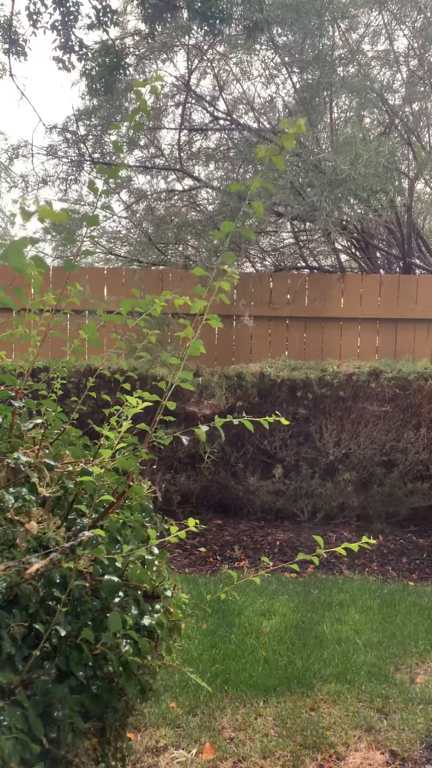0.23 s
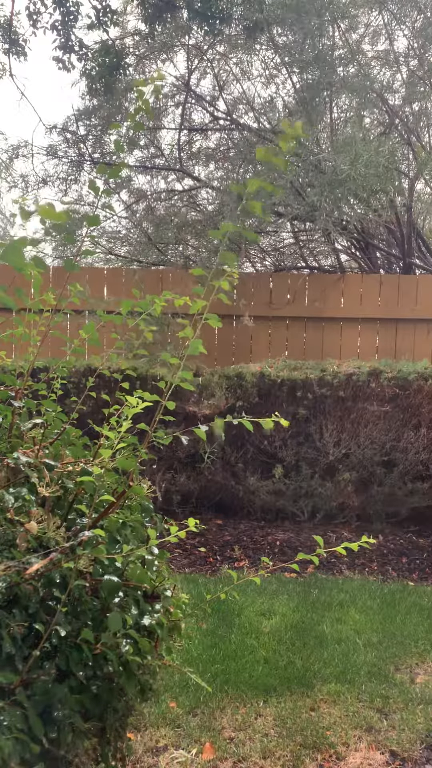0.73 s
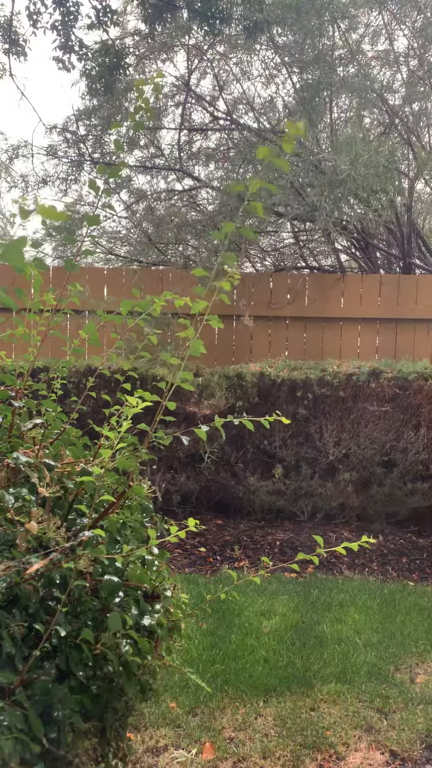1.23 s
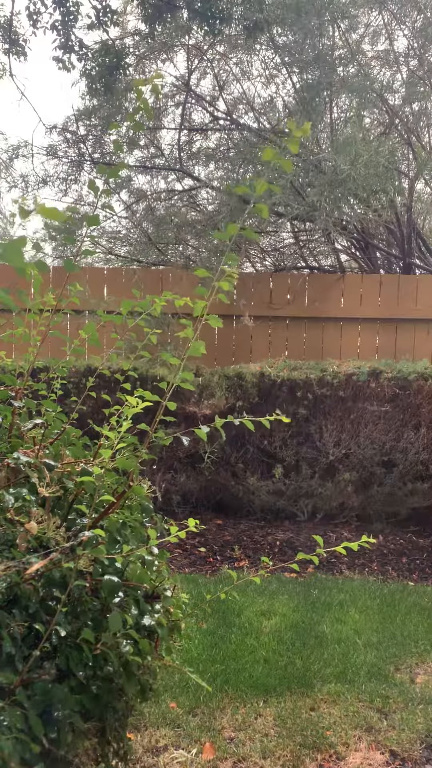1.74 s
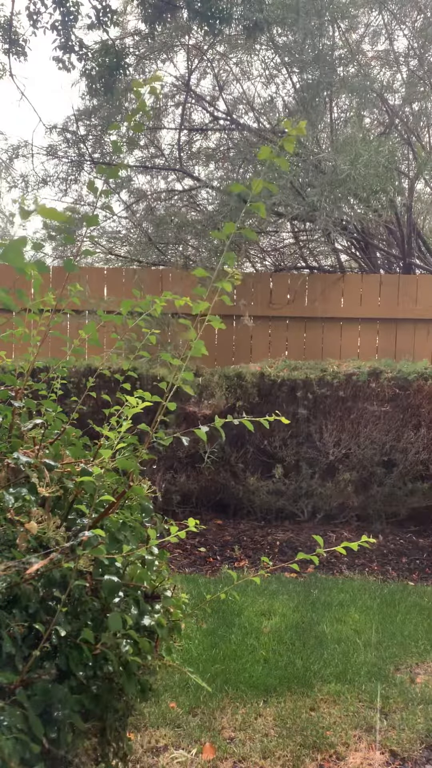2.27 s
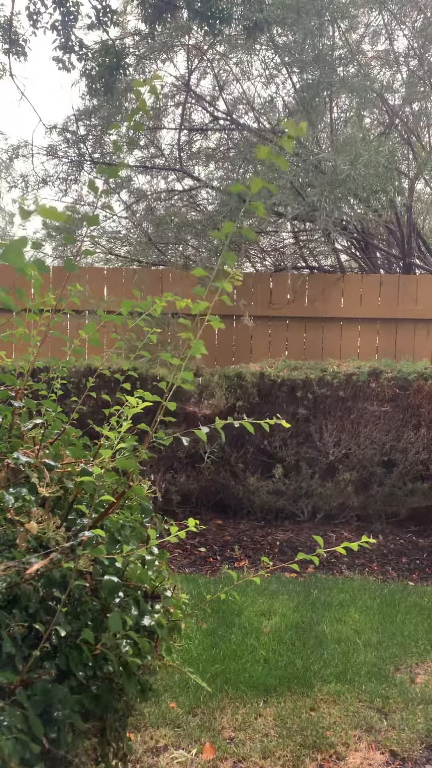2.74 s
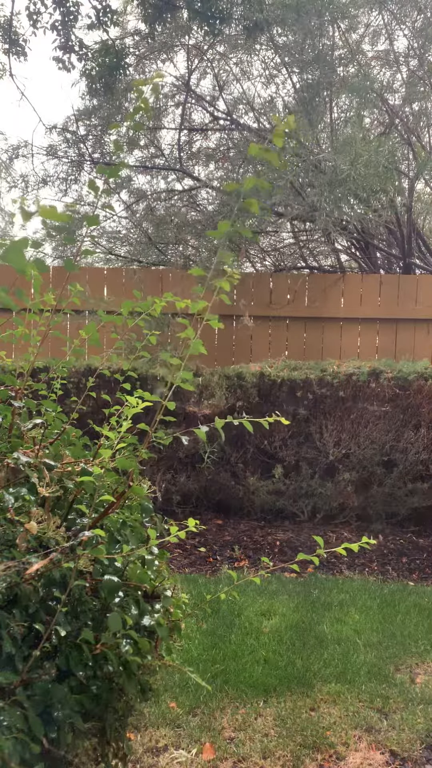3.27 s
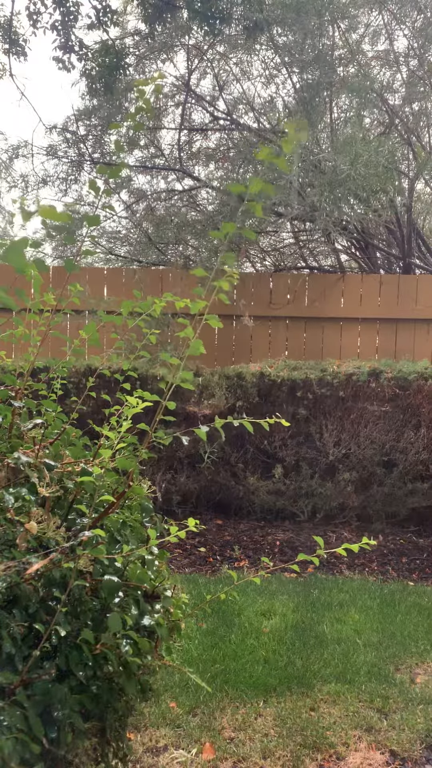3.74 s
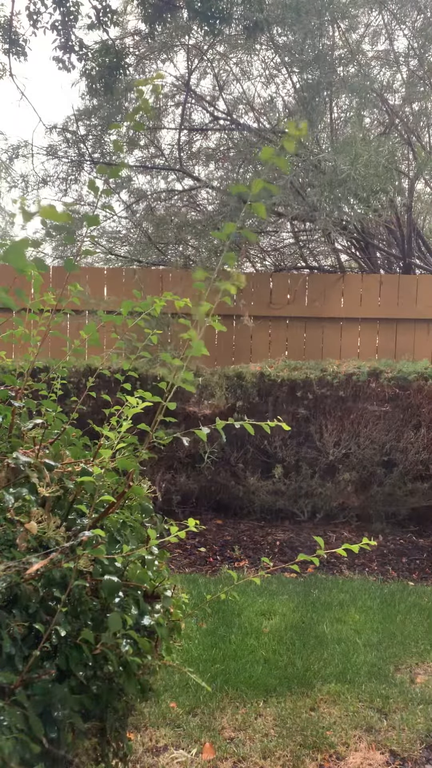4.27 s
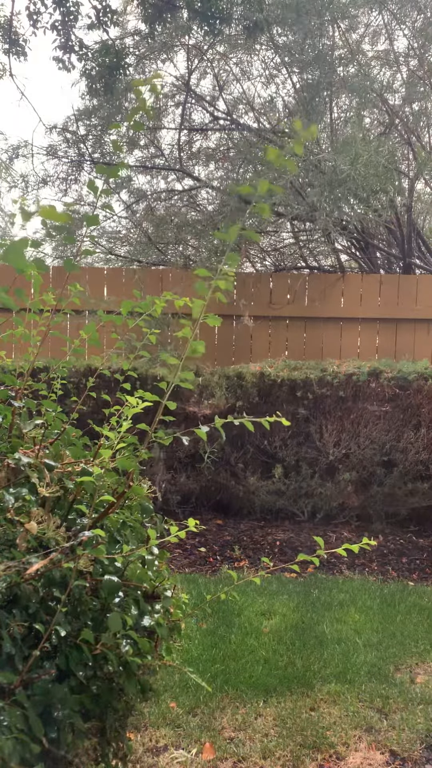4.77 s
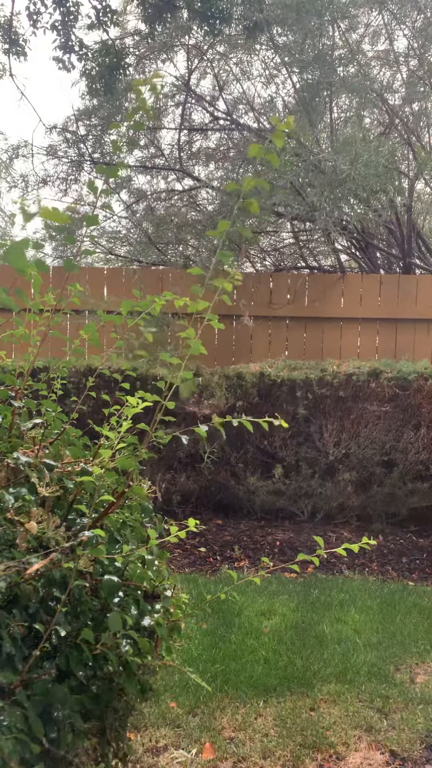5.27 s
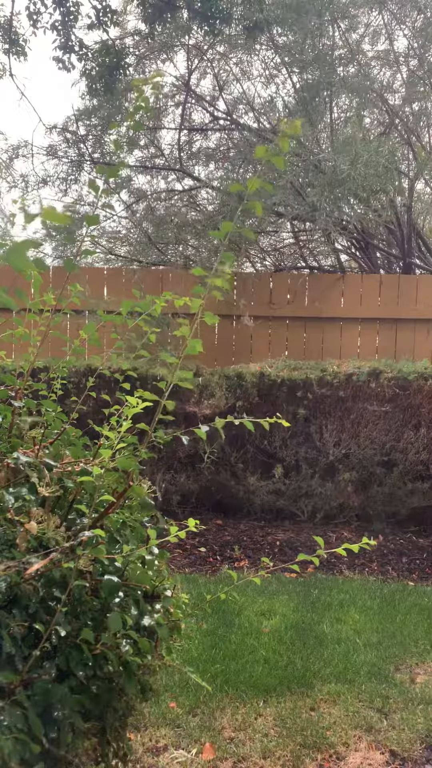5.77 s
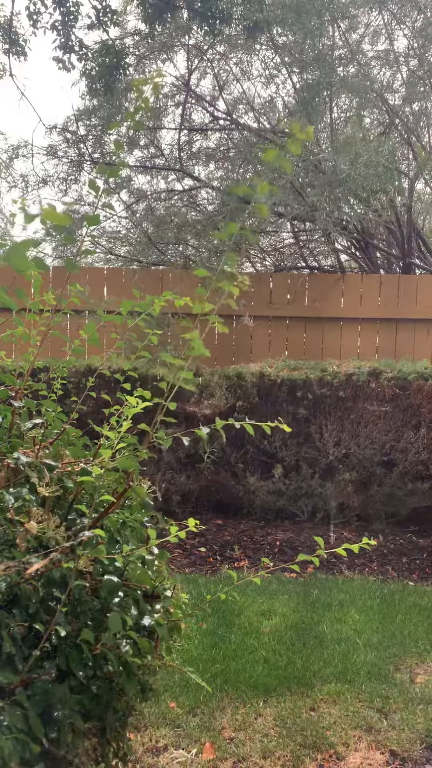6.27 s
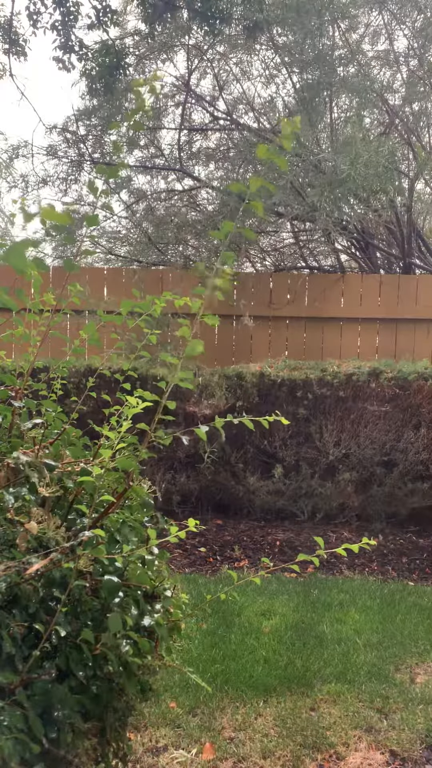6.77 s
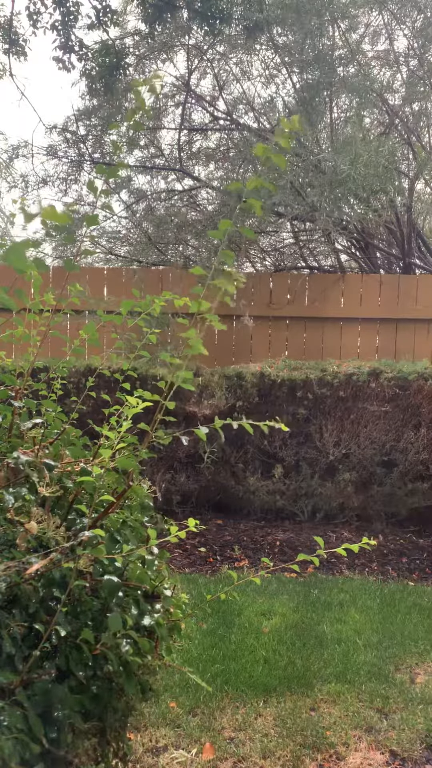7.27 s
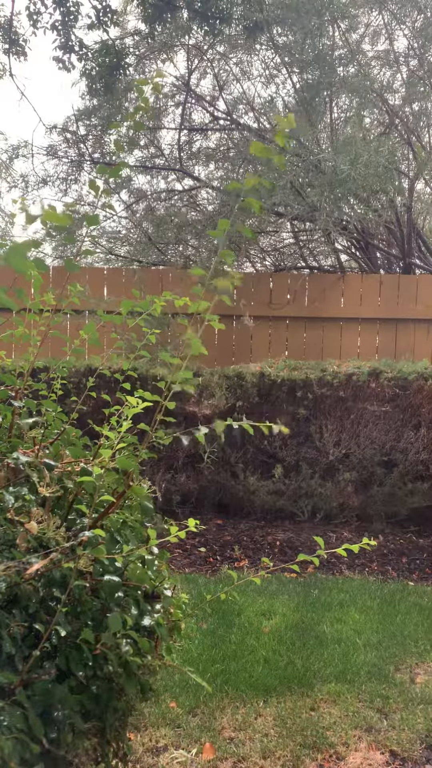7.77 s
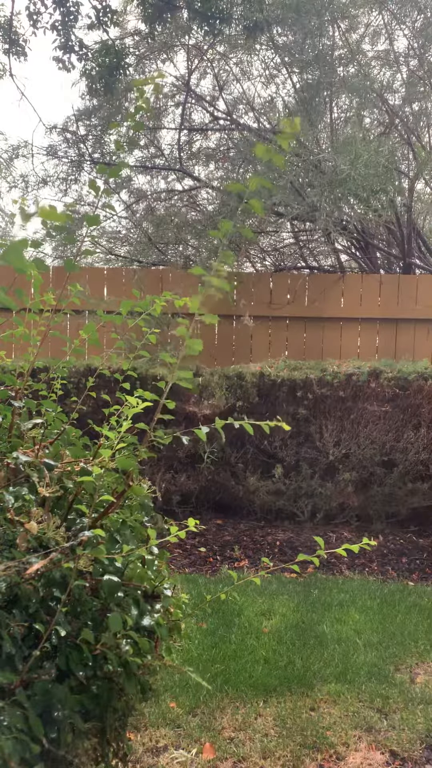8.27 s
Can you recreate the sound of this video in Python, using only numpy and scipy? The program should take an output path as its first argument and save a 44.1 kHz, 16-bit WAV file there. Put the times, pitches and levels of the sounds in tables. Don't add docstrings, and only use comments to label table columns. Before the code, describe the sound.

From 0 to about 8.5 seconds, steady rain falls in a backyard with shrubs, lawn and fence. It is already under way and continues to the end, its strength wavering only slightly. Distant drops blend into a bright, wide hiss; nearer ones make a dense, fine patter and crackle. Irregular close drops stand out throughout: crisp leaf ticks, tiny dry twig clicks, rounded plops sinking in pitch, and a few dull thuds on soil. Sharper thin splashes come near 2.1 and 6.65 seconds, and the strongest leaf snap near 4.95. Far off, a weak low engine drone sinks in pitch until about 3.9, most noticeable around 2 to 3.4, then stays low and faint over soft traffic rumble. The stereo microphone is still, close to the foliage, with very short reflections from fence and walls.

```python
import sys
import numpy as np
from scipy import signal
from scipy.fft import rfft, irfft
from scipy.io import wavfile
from scipy.ndimage import uniform_filter1d

SR = 44100
rng = np.random.default_rng(int(sys.argv[2]) if len(sys.argv) > 2 else 0)


def decibels_to_gain(level_db):
    exponent = np.asarray(level_db, float) / 20
    return 10 ** exponent


def inscribe(sig):
    pcm = np.round(np.clip(np.atleast_2d(sig).T, -1, 1) * 32767)
    wavfile.write(sys.argv[1], SR, pcm.astype(np.int16))


N = 375291

# t/s, level/dB
RAIN = [(0.0, -45), (0.33, -44.5), (0.45, -44.5), (0.871, -45), (1.02, -45), (1.59, -44.5), (1.92, -44),
        (2.89, -44.5), (3.27, -44.5), (4.81, -45.5), (5.02, -43.5), (5.95, -45), (7.85, -44.5), (8.08, -46),
        (8.51, -43.5)]
FIZZ_SHARE, PATTER_SHARE = 0.88, 0.61
# f/Hz, level per Hz/dB
WASH = [(150, -6), (350, -7), (600, -1.5), (1000, 5), (1500, 0.5), (2200, 4.5), (3200, 5), (5000, 7),
        (7000, 4), (9500, 7), (11200, 6), (12300, 0.5), (15500, 6), (17000, -80)]
# f/Hz, level/dB
PATTER = [(400, 0), (800, -6.5), (1500, -4), (3000, -4.5), (5000, 0.5), (7000, 4.5), (11200, 5),
          (15500, 2.5)]
# f/Hz, phase/rad
RIGHT_LAG = [(0, 0), (1000, .15), (2000, .9), (2900, 2.0), (3700, 1.7), (4800, 3.14), (17400, 21.99)]
# f/Hz, level/dB
APART = [(60, -47), (180, -17.5), (350, -5.5), (600, -2), (1000, -1.5), (1600, -3), (2500, -0.45),
         (3300, -1.9), (4200, -3.5), (5000, -9.5), (16000, -6)]
# f/Hz, width/Hz, level/dB
EAVES = [(816, 300, 4), (934, 11, -5.5), (1163, 26, 4.5), (1294, 50, 8), (1470, 148, 6.5), (1570, 36, 7.5),
         (1735, 144, 6.5), (1950, 120, 5), (2166, 270, 1.5), (2514, 49, 6), (2886, 17, 4), (3190, 19, -7.5)]
# t/s, firing f/Hz, level/dB
ENGINE = [(0, 124.5, -58.5), (.35, 124, -55.5), (.8, 123, -50.5), (1.4, 122, -57), (1.7, 118, -50.5),
          (2, 113, -46.5), (2.6, 110, -55.5), (3.1, 108, -47), (3.4, 107, -44), (3.65, 103, -51),
          (3.85, 97, -56.5), (4.6, 98, -51), (5.2, 98, -53), (6, 97, -59.5), (6.3, 96, -60.5),
          (7.7, 98.5, -54), (8.51, 100, -54)]
# f/Hz, level per Hz/dB
RUMBLE = [(8.8, -58), (15, -10), (32, -7.5), (80, -1), (94, -4), (112, -6), (140, -6.5), (241, -9.5),
          (270, -10.5), (311, -13.5), (348, -19), (379, -15.5), (450, -18.5), (580, -28), (990, -120)]
# t/s, level/dB
RUMBLE_DB = [(0, -53.5), (3.5, -53.5), (8.51, -53)]

# f/Hz, rise/cycles
LEAF = [(4000, 1.0), (7100, 1.5), (11000, 1.7), (14500, 2.2)]
BROAD_LEAF = [-3, 3.5, 16, 14]
SMALL_LEAF = [-17, 9, 7, 17]
TINY_LEAF = [-22, 1.5, 8, 6]
# t/s, peak level/dB, spill into other rings/dB
BROAD_TICKS = [(0.0124, -38, -19), (0.1935, -40.5, -5), (0.2299, -25.5, -32), (0.5916, -26, -14.5),
               (0.6459, -28, -25.5), (0.9273, -25, -10.5), (0.9657, -25, -18), (1.1867, -28, -16),
               (1.2004, -32, -4), (1.4581, -25, -16), (1.6222, -24.5, -15), (1.8342, -25.5, -10),
               (1.9061, -20, -11), (1.9584, -26, -18), (2.1181, -25.5, -11), (2.5341, -29.5, -15.5),
               (3.247, -23.5, -17), (3.3418, -33.5, -8), (3.5279, -26.5, -19), (3.7713, -25, -19),
               (4.4263, -31.5, -10), (5.1402, -28, -11.5), (6.6483, -25, -12), (6.7092, -31, -5),
               (7.1906, -27.5, -9), (7.5153, -26, -19), (7.5882, -23.5, -26), (7.891, -28.5, -13),
               (7.9453, -32, -15), (8.1055, -28.5, -11)]
SMALL_TICKS = [(0.0682, -37, -12), (0.5275, -33, -1), (1.6634, -26, -7), (2.1885, -27, -15), (2.2, -27, -8),
               (2.353, -28, -10), (2.364, -29, -8), (2.735, -30, -5.5), (3.039, -30, -13),
               (3.3794, -31, -8), (3.708, -33, -9), (3.7567, -40, -10), (4.253, -29.5, -7),
               (4.573, -25, -10), (4.6648, -32, -10.5), (4.871, -23, -21), (4.902, -26, -9),
               (4.94, -28, -21), (4.9519, -12.5, -18), (5.29, -44, -21), (5.584, -28.5, -9),
               (5.7492, -26, -10), (5.8065, -39, -21), (6.0806, -35, -8), (6.622, -24, -16),
               (6.728, -30.5, -7), (6.9907, -38, -13), (7.004, -33, -19.5), (7.8456, -27.5, -14),
               (8.407, -41, -21)]
TINY_TICKS = [(0.1865, -37, -11), (0.3102, -36.5, -3), (0.504, -20, -17), (0.569, -30, -0.5),
              (1.0914, -27, -11), (1.2531, -23, -23), (2.123, -24, -16), (2.3855, -32, -16),
              (2.4747, -26, -7), (2.5097, -25, -4), (2.814, -25.5, -8.5), (3.1737, -34, -8),
              (3.7948, -26, -10), (4.8274, -33, -18), (6.098, -22, -18), (6.9411, -23, -12),
              (7.43, -24.5, -8.5), (7.7383, -25, -7), (7.9806, -41, -13), (8.2152, -42, -4)]
MORE_BROAD = [(1.1516, -30, -26.5), (1.629, -25, -17), (1.8855, -29, -17), (2.0556, -30, -23),
              (2.449, -33, -27), (3.0774, -28.5, -14), (3.1947, -30, -16), (3.3892, -29, -22),
              (4.2176, -28.5, -13), (6.5903, -32, -9), (7.1114, -30, -8), (7.3305, -31, -15.5)]
MORE_SMALL = [(1.062, -30, -13), (1.202, -38, -16), (1.2471, -30, -17), (1.8184, -34, -19),
              (1.8455, -30, -15), (2.1612, -28, -8), (2.3706, -30.5, -23), (2.488, -31, -22),
              (2.5346, -28.5, -18.5), (3.1434, -26.5, -8), (3.395, -29, -14), (3.4272, -30, -16),
              (3.6235, -33, -11), (3.837, -28, -14), (3.848, -28, -14), (4.3781, -39, -19),
              (4.9652, -22, -14), (4.9847, -26, -8.5), (5.3963, -35, -26), (5.8065, -28, -15),
              (6.2138, -30, -12), (6.4788, -32, -20), (7.0037, -30, -14), (7.2256, -30, -6),
              (7.4812, -30, -12), (7.7974, -39, -17), (7.9056, -38, -17), (8.2145, -38, -17),
              (8.2484, -29.5, -18), (8.3107, -31, -18), (8.4068, -36, -27), (8.4479, -34, -9)]
MORE_TINY = [(0.9705, -36, -1), (1.933, -35, 3), (2.385, -30, -9), (2.6066, -43, -17), (2.6168, -32, -4),
             (3.249, -24, -2.5), (3.3417, -30, -1), (3.644, -37, 2), (3.757, -24, -10), (4.156, -35, 1),
             (4.441, -37, -12), (4.8279, -34, -9), (5.1064, -34, -1), (5.291, -44, -3), (6.9907, -20, -9),
             (7.3143, -37, 1), (7.4156, -26, -10), (7.9786, -34, -5), (8.0447, -33, -14), (8.287, -38, -9)]
# t/s, peak level/dB
CRACKS = [(.0692, -26), (.0745, -32), (.31, -23), (.3603, -30), (.5276, -22), (.9702, -30), (.9906, -31),
          (1.1326, -31), (1.2014, -27), (1.4425, -29), (1.5414, -31), (1.623, -17), (1.845, -27),
          (2.371, -24), (2.386, -29), (2.488, -28), (2.5396, -30), (2.5467, -31), (2.6066, -31),
          (2.812, -25), (3.104, -26), (3.17, -25), (3.3954, -31), (3.541, -25), (3.7163, -31),
          (3.7277, -30), (3.7573, -27), (3.8485, -30), (3.9179, -30), (4.1552, -29), (4.378, -31),
          (4.4396, -25), (4.4725, -26), (4.665, -24), (4.828, -23), (5.1406, -28), (5.289, -25),
          (5.5236, -32), (6.0807, -31), (6.2262, -31), (6.5836, -31), (6.73, -26), (6.892, -31),
          (7.112, -27), (7.0042, -25), (7.3132, -26), (7.3304, -31), (7.7339, -31), (7.797, -31),
          (7.9056, -31), (7.9785, -31), (8.045, -31), (8.216, -26), (8.2881, -31), (8.407, -21)]
# t/s, peak level/dB, lean to left/dB
HARD_CRACKS = [
    (2.352, -23, 0),
    (3.0397, -22, -2),
    (3.708, -21, -1),
    (6.6477, -23, -8),
    (6.941, -24, 3),
]

# t/s, peak level/dB, f/Hz
PLOPS = [(0.0917, -26.5, 1610), (0.193, -34.5, 2000), (0.4, -34.5, 1720), (0.4287, -27.5, 660),
         (1.254, -32, 1750), (1.813, -30.5, 1940), (1.942, -32.5, 1590), (2.006, -34.5, 1470),
         (2.118, -38, 1230), (2.29, -34.5, 1080), (2.963, -35.5, 1250), (3.155, -31.5, 1570),
         (3.344, -37, 2000), (3.42, -35, 1410), (3.435, -28, 1310), (4.182, -36, 1950), (4.588, -33.5, 457),
         (4.884, -34, 1550), (5.1856, -25.5, 1200), (5.343, -34, 1140), (5.523, -37, 1470),
         (5.734, -36, 1590), (5.748, -30, 1770), (5.94, -31.5, 1050), (6.447, -35, 1380),
         (6.942, -39, 2000), (7.185, -33.5, 1190), (7.235, -30, 1410), (8.289, -35, 1460),
         (8.473, -33, 1470),
         (0.0597, -35, 1760), (0.067, -34.5, 2100), (0.2772, -33, 2200), (0.4421, -43, 870),
               (0.505, -37, 1860), (0.5128, -39, 1750), (0.5562, -35.5, 1250), (0.5787, -35.5, 1400),
               (0.7487, -38.5, 1770), (0.835, -33, 1870), (0.8974, -40, 2520), (0.9998, -34.5, 1960),
               (1.335, -34, 2160), (1.5033, -35, 1170), (1.5684, -36, 1510), (1.7572, -35, 1240),
               (1.776, -37, 1520), (1.8643, -37, 910), (2.044, -39.5, 1890), (2.0615, -40, 1440),
               (2.1872, -33, 1780), (2.6328, -35.5, 1760), (3.1723, -33, 1510), (3.1943, -32, 2310),
               (3.345, -36, 1950), (3.4478, -35, 1260), (3.466, -42, 1510), (4.0542, -34.5, 1240),
               (4.5618, -35, 1480), (4.8923, -31, 2310), (4.902, -42, 1440), (5.2048, -38, 1460),
               (5.2347, -36, 1280), (5.372, -37, 1380), (5.4022, -34, 1560), (5.973, -33, 1880),
               (6.372, -35, 2000), (0.528, -40, 1520), (5.528, -37, 1500), (7.249, -33, 1410),
               (8.482, -34, 1500)]
# t/s, peak level/dB, f/Hz
HIGH_PLOPS = [
    (0.9064, -31.5, 2410),
    (3.1542, -38, 2080),
    (4.4722, -33, 2170),
    (4.4864, -35, 2520),
    (5.0055, -29.5, 3080),
    (8.2482, -27, 2790),
]
# t/s, peak level/dB, f/Hz
SPLASHES = [(0.569, -28, 5700), (0.655, -24.5, 5440), (.7101, -25, 4320), (2.056, -16, 4770),
            (2.6283, -26, 5200), (2.657, -25, 4500), (3.623, -29, 5200), (4.5298, -38, 4970),
            (6.14, -30, 5300), (6.6506, -15.5, 3680), (6.6502, -21, 5800), (6.9497, -31, 4600),
            (7.113, -29, 5840), (7.493, -41, 3770), (7.8454, -27.5, 5130), (8.333, -26, 5340),
            (8.488, -34, 5310)]
MORE_SPLASHES = [(0.5682, -28, 4730), (0.6477, -36, 5400), (0.678, -41, 3010), (0.788, -31, 4240),
                 (0.899, -29, 2450), (3.177, -34, 3000), (2.047, -34, 2830), (1.2902, -37, 3900),
                 (1.778, -22, 4600), (2.007, -32, 2970), (2.016, -31, 2970), (2.1308, -30, 5070),
                 (2.2012, -39, 4230), (2.4505, -24, 5240), (3.0403, -40, 5130), (3.111, -36, 4780),
                 (3.529, -27, 5500), (3.7095, -33, 4520), (4.999, -27, 3850), (5.1817, -31, 5050),
                 (5.4675, -39, 5330), (5.5235, -27.5, 2440), (6.6918, -30, 5010), (6.7105, -24, 5210),
                 (7.5898, -32.5, 5130), (7.7658, -31, 2700), (7.7737, -25.5, 3700), (8.3949, -30, 2640)]
# t/s, peak level/dB, f/Hz
MORE_PLOPS = [
    (0.4519, -32, 1790),
    (0.9423, -36.5, 1160),
    (1.488, -32.5, 1570),
    (2.831, -36, 450),
    (3.437, -33.5, 453),
    (5.188, -37, 865),
    (5.945, -38, 590),
    (8.1, -41, 550),
]
# t/s, decay/s, f/Hz, level/dB
SPATTERS = [
    (2.007, 0.049, 3000, -43),
    (2.061, 0.02, 4900, -28),
]

LEAD = 200
TICK_RISE_S, PLOP_RISE_S = 0.001, 0.001944
LEAF_LEAN_DB, GROUND_LEAN_DB, CRACK_LEAN_DB = 9.5, 1, -1.5


def evened(x):
    return x / np.sqrt(np.mean(x ** 2) + 1e-20)


def read(points, hz):
    f, value = np.transpose(points)
    return np.interp(np.log(hz + 1), np.log(f + 1), value)


def shaped(noise, spectrum):
    return irfft(rfft(noise) * decibels_to_gain(read(spectrum, np.fft.rfftfreq(N, 1 / SR))), N)


def strength_db(t_s, hz, fizz_hz=3500):
    s, db = np.transpose(RAIN)
    high = 1 / (1 + (fizz_hz / (hz + 1)) ** 4)
    rainy = 1 / (1 + (350 / (hz + 1)) ** 4)
    share = high * FIZZ_SHARE + (1 - high) * PATTER_SHARE
    return rainy * share * np.interp(t_s, s, db - db.mean())


def drop_train_db(size, spread_db, largest_db):
    return np.minimum(-spread_db * np.log(size + 1e-4), largest_db)


def add(mix, t_s, sound):
    part = mix[..., max(round(t_s * SR), 0):][..., :sound.shape[-1]]
    part += sound[..., :part.shape[-1]]


def place(mix, t_s, sound, lean_db, other):
    lean = decibels_to_gain([[[lean_db / 2]], [[-lean_db / 2]]])
    add(mix, t_s - LEAD / SR, lean * np.array([sound, other]))


def ring(hz, cycles, glide=0.):
    n = np.arange(LEAD + int(6 * cycles * SR / hz))
    u = np.maximum((n - LEAD) * hz / SR + cycles, 0)
    swell = (u * np.exp(-u / cycles)) ** 2.18
    wave = swell * np.sin(2 * np.pi * u * (1 + glide * np.tanh(u / cycles)))
    return wave / abs(wave).max()


def snap_of(ring_db, draws):
    snap = np.zeros(500)
    for db, (hz, cycles), bend, late in zip(ring_db, LEAF, *draws):
        add(snap, 0.00036 * late, decibels_to_gain(db) * ring(hz * (.92 + 0.16 * bend), cycles))
    return snap


def spray(draws, db, decay_s, share):
    t = np.arange(draws.shape[1]) / SR
    lands = (draws[0] < share) * np.sign(draws[1] - .5)
    hits = lands * draws[2] * decibels_to_gain(db) * np.exp(-t / decay_s)
    return np.where(t == 0, 1, hits)


def rumble():
    noise = shaped(rng.standard_normal((2, N)), RUMBLE)
    level_db = 4 + np.interp(np.arange(N) / SR, *np.transpose(RUMBLE_DB))
    return decibels_to_gain(level_db) * evened(noise)


def engine():
    s, hz, db = np.transpose(ENGINE)
    t = np.arange(N) / SR
    flutter_db = 1.65 * evened(uniform_filter1d(rng.standard_normal(N), size=3000))
    phase = 2 * np.pi * np.cumsum(np.interp(t, s, hz)) / SR
    return np.sqrt(2) * decibels_to_gain(np.interp(t, s, db) + flutter_db) * np.sin(phase)


def wash(level_db=-41, patchy_db=3.0, flicker_db=2.5):
    frames, hz = N // 128 + 9, np.fft.rfftfreq(512, 1 / SR)[:, None]
    a, b, c, d, patches = rng.standard_normal((frames, 257, 5)).T
    flicker = evened(uniform_filter1d(patches[0], size=5))
    patches = uniform_filter1d(uniform_filter1d(patches, size=8, axis=0), size=16, axis=1)
    uneven_db = (patchy_db * evened(patches) + flicker_db * flicker) * hz / (hz + 800)
    field_db = strength_db(np.arange(frames) * 128 / SR, hz) + uneven_db
    spectra = np.array([a + 1j * b, c + 1j * d]) * decibels_to_gain(field_db)
    noise = signal.istft(spectra, nperseg=512, noverlap=384)[1][:, :N]
    return decibels_to_gain(level_db) * evened(shaped(noise, WASH))


def patter(per_s=1400, spread_db=5.0, level_db=-48, largest_db=12, count=30):
    out, t = np.zeros((2, N)), np.arange(N) / SR
    for hz in np.geomspace(400, 15500, count):
        luck, size, sign = rng.random((3, N))
        lands = luck < per_s / count / SR * (hz / 3000) ** .4
        train = lands * decibels_to_gain(drop_train_db(size, spread_db, largest_db) + strength_db(t, hz))
        other = np.roll(train * np.sign(sign - .5), rng.integers(-25, 25))
        grain = ring(hz, rng.uniform(.6, 1.6), rng.uniform(-0.19, 0.11))
        drops = signal.oaconvolve([train, other], grain[None], axes=1)[:, :N]
        out += decibels_to_gain(read(PATTER, hz)) * np.sqrt(hz / 3000) * drops
    return decibels_to_gain(level_db) * evened(out)


def crackle(per_s=400, spread_db=3.5, level_db=-48, count=16):
    out, t = np.zeros(N), np.arange(N) / SR
    for draws in rng.random((count, 3, len(LEAF))):
        luck, size = rng.random((2, N))
        lands = luck < per_s / count / SR
        train = lands * decibels_to_gain(drop_train_db(size, spread_db, 11) + strength_db(t, 9000))
        ring_db = np.array([-17.5, -4.0, 1.5, -2.5]) - 14 * draws[0]
        out += signal.oaconvolve(train, snap_of(ring_db, draws[1:]))[:N]
    return decibels_to_gain(level_db) * evened(np.array([out, -np.roll(out, 9)]))


def plops(trim_db=1.18):
    out = np.zeros((2, 2, N))
    rows = [(s + PLOP_RISE_S, db, hz) for s, db, hz in PLOPS + HIGH_PLOPS]
    rows += SPLASHES + MORE_PLOPS + MORE_SPLASHES
    for (s, db, hz), draws in zip(rows, rng.random((len(rows), 3, 2000))):
        sag = .14 * min(1, 1500 / hz)
        swing = ring(hz * (1 + 1.3 * sag), 0.6 * (hz / 1000) ** 0.66, -sag)
        scatter = spray(draws, -12.5, .025 * min(1, 2200 / hz) ** 2, .035)
        sound = decibels_to_gain(db + trim_db) * np.convolve(scatter, swing)
        place(out, s, sound, GROUND_LEAN_DB, .6 * np.roll(sound, 4))
    for (s, decay_s, hz, db), draws in zip(SPATTERS, rng.random((len(SPATTERS), 3, 3000))):
        sound = decibels_to_gain(db) * np.convolve(spray(draws, 11.0, decay_s, 0.021), ring(hz, 1.15))
        place(out, s, sound, 0, np.roll(sound, 12))
    return out


def cracks(hz=9500, cycles=.45, trim_db=4):
    out, click = np.zeros((2, 2, N)), ring(hz, cycles)
    for s, db, lean_db in [(s, db, CRACK_LEAN_DB) for s, db in CRACKS] + HARD_CRACKS:
        sound = decibels_to_gain(db + trim_db) * click
        place(out, s + TICK_RISE_S, sound, lean_db, -np.roll(sound, 9))
    return out


def ticks(broad, small, tiny, trim_db=-0.6):
    out = np.zeros((2, 2, N))
    sizes = [(broad, BROAD_LEAF), (small, SMALL_LEAF), (tiny, TINY_LEAF)]
    for main, (rows, leaf_db) in enumerate(sizes, 1):
        spilt = np.arange(len(leaf_db)) != main
        for (s, db, spill_db), draws in zip(rows, rng.random((len(rows), 3, 1200))):
            snap = snap_of(db + np.array(leaf_db) + spill_db * spilt, draws[1:])
            sound = decibels_to_gain(trim_db) * np.convolve(spray(draws, -7, .004, .055), snap)
            lean_db = LEAF_LEAN_DB * (draws[0, 0] - .5)
            place(out, s + TICK_RISE_S, sound, lean_db, -np.roll(sound, 9))
    return out


def yard(x, wet_db=-9, low_t60_s=.2, high_t60_s=0.027):
    hz, t, z = signal.stft(rng.standard_normal((1, 2, SR // 4)), SR, nperseg=128)
    t60_s = read([(1500, low_t60_s), (7000, high_t60_s)], hz)[:, None]
    tail = signal.istft(z * decibels_to_gain(-60 * t / t60_s) * np.sqrt(.1 / t60_s), SR, nperseg=128)[1]
    tail *= decibels_to_gain(wet_db) / np.linalg.norm(tail[0, 0])
    return x + signal.fftconvolve(x, tail, axes=2)[..., :N]


def ports(left, right):
    hz = np.fft.rfftfreq(N, 1 / SR)
    apart = decibels_to_gain(np.minimum(read(APART, hz), 0))
    lag = np.exp(-1j * np.interp(hz, *np.transpose(RIGHT_LAG)))
    eaves = decibels_to_gain(sum(db / (1 + (2 * (hz - f) / width) ** 2) for f, width, db in EAVES))
    right = lag * (np.sqrt(1 - apart ** 2) * rfft(right[0]) + apart * rfft(right[1]))
    return irfft(eaves * np.array([rfft(left[0]), right]), N)


def scene():
    leaves = ticks(BROAD_TICKS, SMALL_TICKS, TINY_TICKS)
    leaves += ticks(MORE_BROAD, MORE_SMALL, MORE_TINY)
    near = yard(leaves + cracks() + plops() + patter() + crackle())
    left, right = near + wash() + rumble()
    return ports(left, right) + engine()


def top_cut(x):
    return signal.sosfilt(signal.butter(12, 17600, fs=SR, output="sos"), x)


def record(dry):
    return top_cut(dry)


dry = scene()
out = record(dry)
inscribe(out)
```